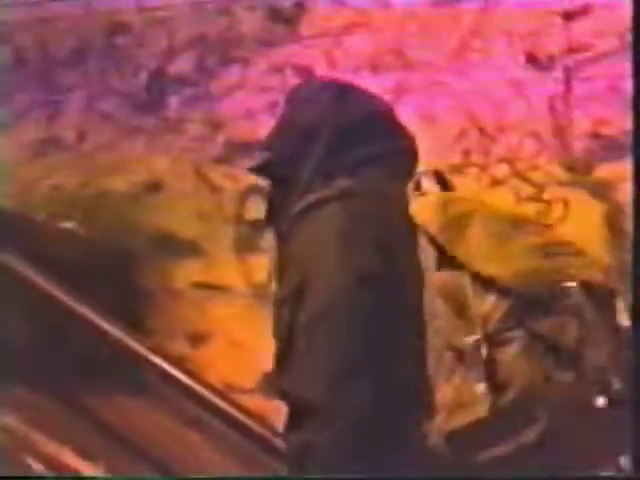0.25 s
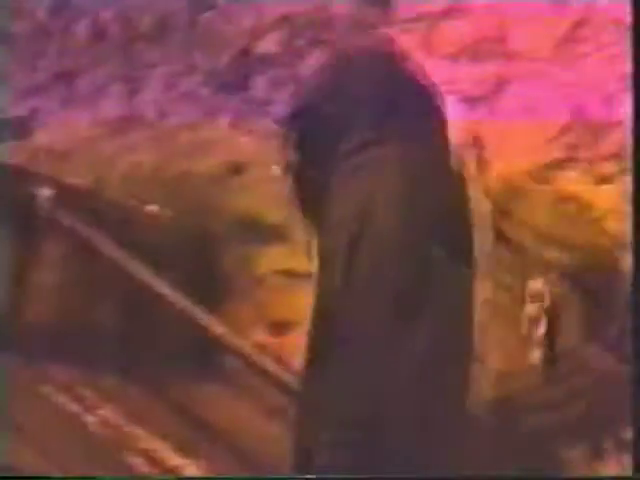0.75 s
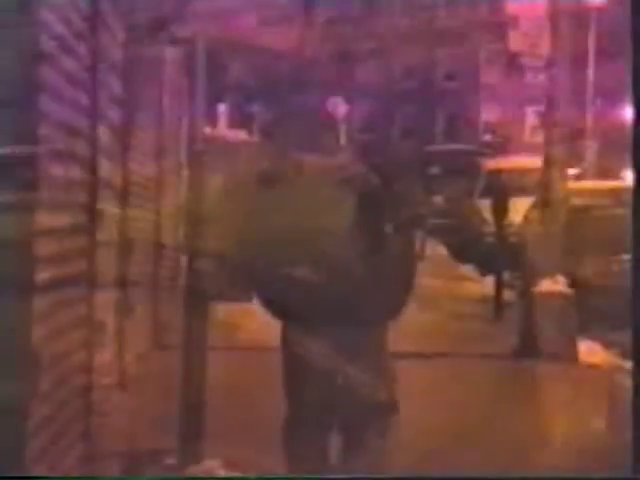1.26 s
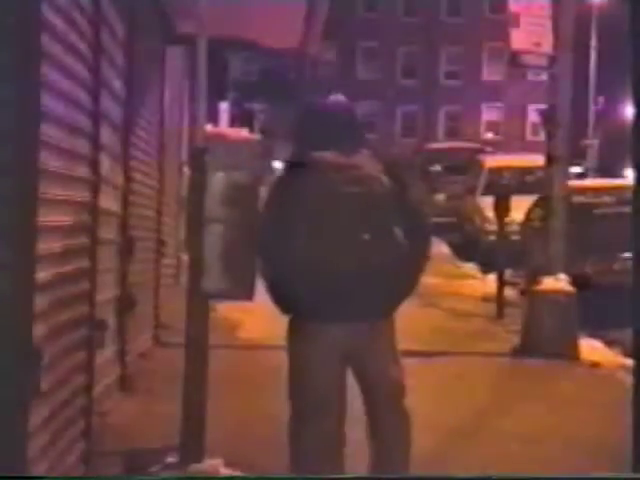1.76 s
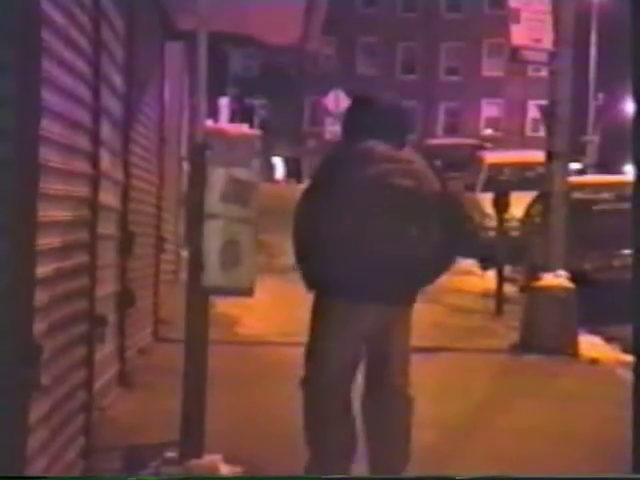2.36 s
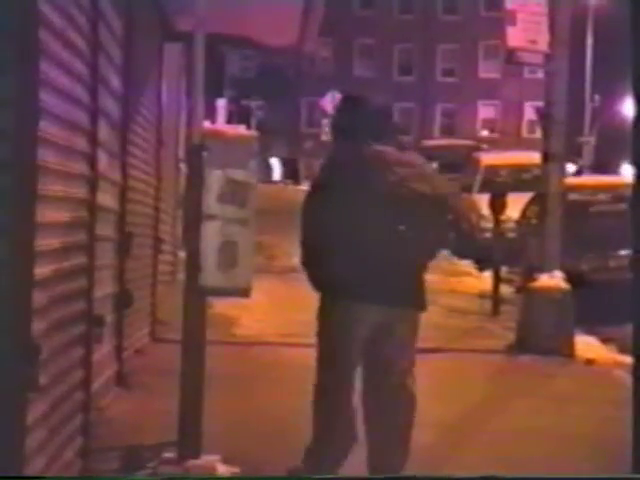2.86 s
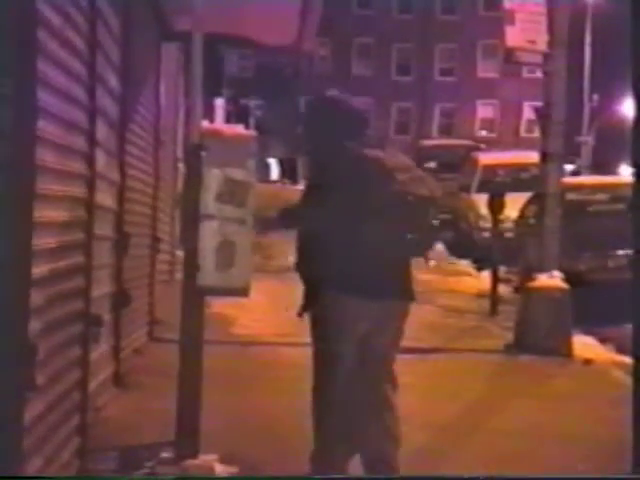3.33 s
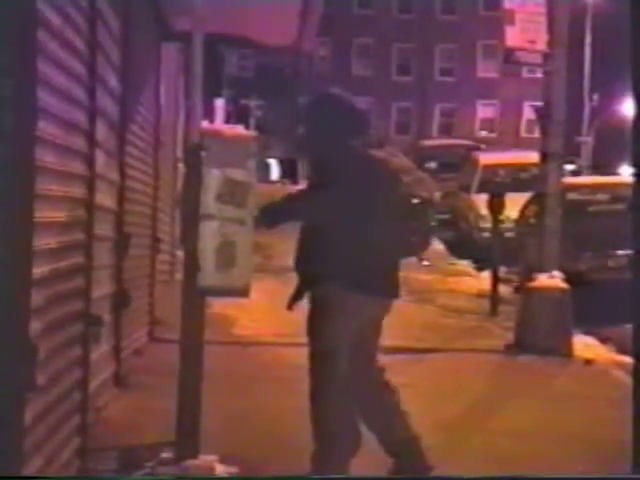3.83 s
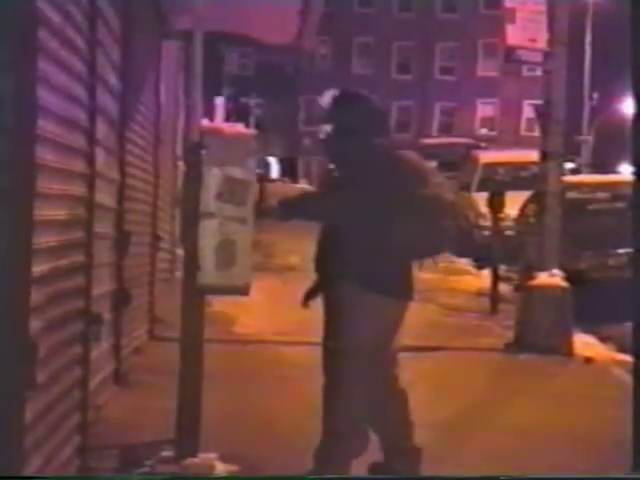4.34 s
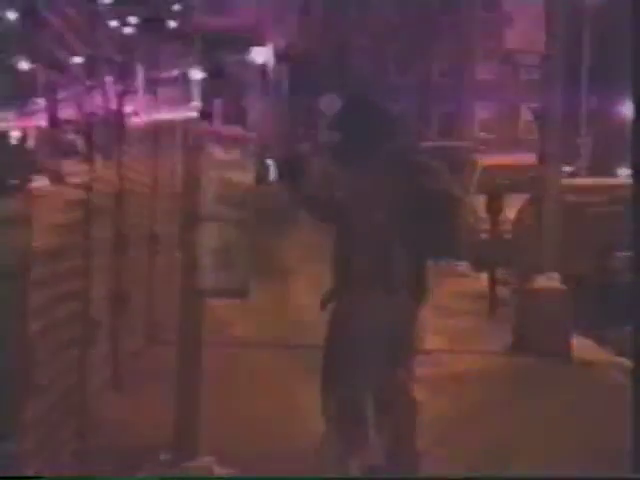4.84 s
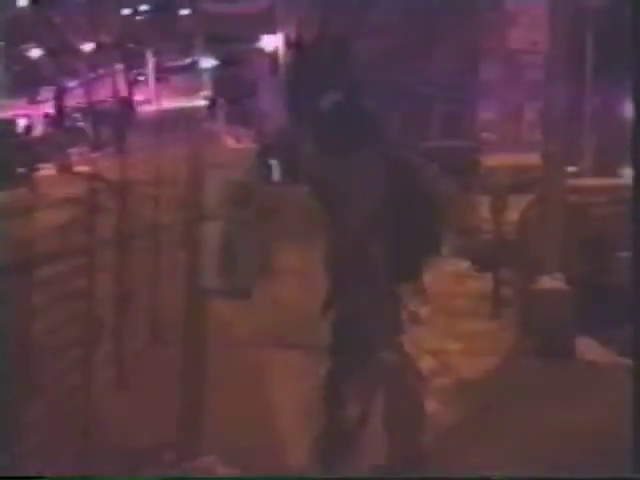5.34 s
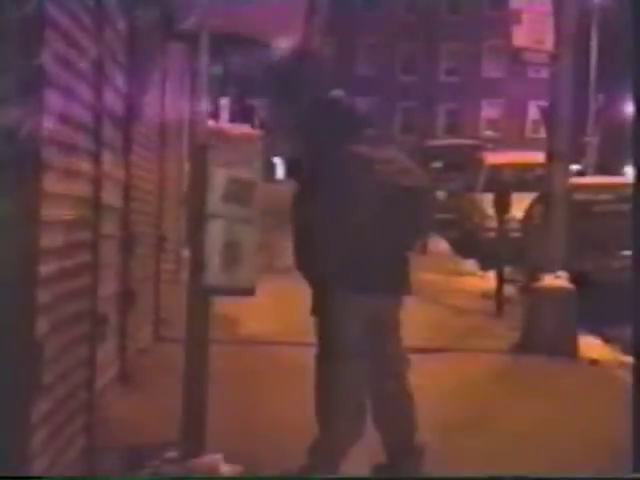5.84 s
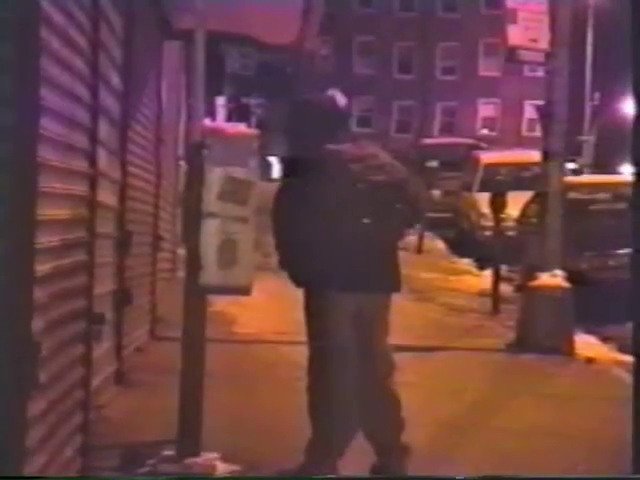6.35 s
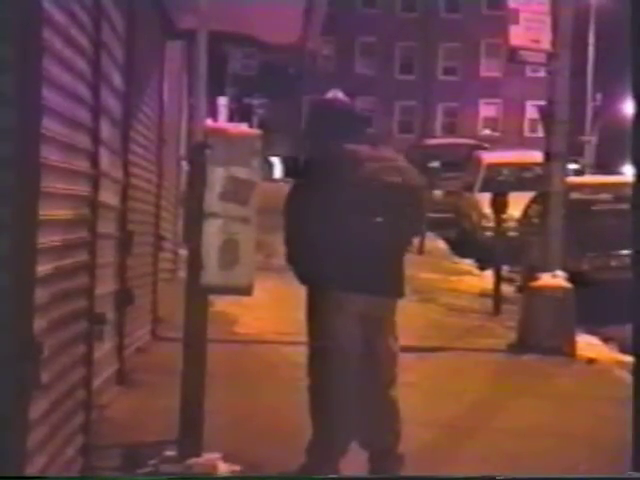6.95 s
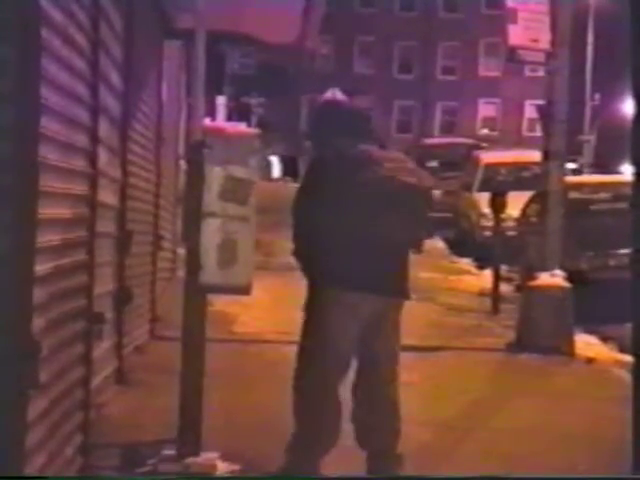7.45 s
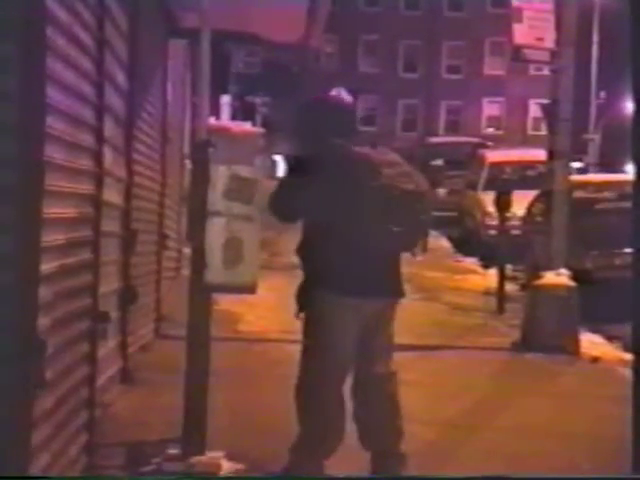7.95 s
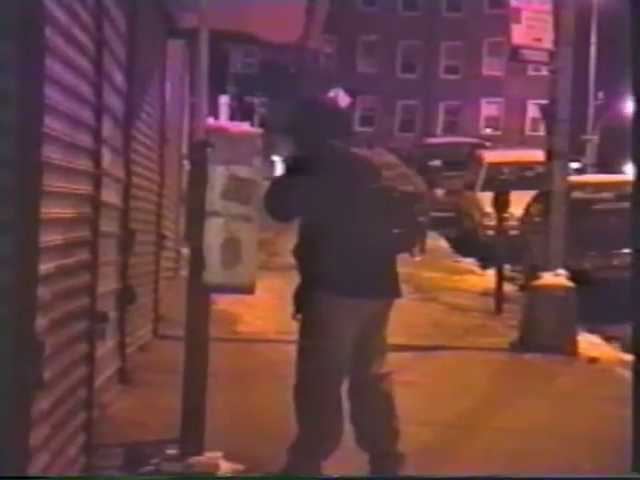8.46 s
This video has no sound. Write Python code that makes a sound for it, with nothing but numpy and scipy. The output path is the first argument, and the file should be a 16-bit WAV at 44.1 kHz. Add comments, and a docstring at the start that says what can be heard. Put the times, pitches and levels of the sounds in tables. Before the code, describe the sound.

Blank soundtrack noise, taken directly from the tape head without any microphone, place or distance. Airy, treble-heavy hiss dominates from start to end, roughened by a rapid flutter. A low mains hum, strongest around 180 hertz, wavers minutely under it, joined by faint field buzz, motor tones, a very high whistle and a soft low murmur. Tiny dips in the hiss occur early and again late; no footsteps, traffic or city sounds.

```python
"""Bright tape hiss comes first: it flutters, drifts and drops out briefly, heard straight off the head of a
worn video tape with a blank sound track, so there is no room, no distance and no microphone.
Under this shaped noise lie sums of sines: the odd overtones of mains hum printed on the tape, a buzz at the
picture's field rate, a few faint motor tones and the whistle of the line scan. Noise also makes a low murmur.
The converter sits on a constant offset."""
import sys
import numpy as np
from scipy.fft import rfft, irfft, next_fast_len
from scipy.io import wavfile
from scipy.ndimage import map_coordinates

SR = 44100
rng = np.random.default_rng(int(sys.argv[2]) if len(sys.argv) > 2 else 0)


def unload_audio(sound):
    """Save the sound as a 16-bit wav file, at the path given as the first command line argument."""
    columns = np.transpose(np.atleast_2d(sound))
    # keep every value between -1 and 1, then stretch to whole-number steps
    steps = np.round(np.clip(columns, -1, 1) * 32767)
    wavfile.write(sys.argv[1], SR, steps.astype(np.int16))


N = 383229
T = np.arange(N) / SR
SLOW = np.arange(0, N / SR, .002)  # s, coarse time grid for slow curves

MAINS_HZ, FIELD_HZ = 59.996, 59.94
IN_STEP_S = -1.5  # s, moment when the two slowly beating fundamentals agree


def amp(db):
    """Gain of a level in dB."""
    return 10 ** (np.asarray(db) / 20)


def unit(x):
    """x scaled to rms 1."""
    return x / np.sqrt(np.mean(x ** 2))


def wobble(rate):
    """A smooth random curve through normally distributed knots, rate knots a second."""
    knots = rng.standard_normal(int(N * rate / SR) + 4)
    curve = map_coordinates(knots, [SLOW * rate])  # cubic spline
    return np.interp(T, SLOW, curve)


def filtered(x, response):
    """x with its spectrum multiplied by a response, a function of frequency in Hz."""
    m = next_fast_len(N + 8192)
    gain = response(np.fft.rfftfreq(m, 1 / SR))
    return irfft(rfft(x, m) * gain, m)[..., :N]


def noise(points):
    """Noise of rms 1 coloured by (Hz, dB) points on a log frequency axis, all but silent outside them."""
    f, db = np.transpose(points)

    def colour(hz):
        return amp(np.interp(np.log(hz + 1), np.log(f), db, -120, -120))

    return unit(filtered(rng.standard_normal(N), colour))


def overtones(table, turns):
    """Sines on whole multiples of a phase in turns, read from one drawn cycle."""
    start = rng.random(len(table))  # turns
    start[0] = 0  # only the first has a known start
    cycle = np.linspace(0, 1, num=4097)
    shape = 0
    for (multiple, db), p in zip(table, start):
        sine = np.sin(2 * np.pi * (round(multiple) * cycle + p))
        shape = shape + np.sqrt(2) * amp(db) * sine  # sqrt(2) turns rms into peak
    return np.interp(turns % 1, cycle, shape)


def hiss():
    """Tape hiss; any gap between tape and head costs short wavelengths, the treble, most."""
    # colour of the hiss: f/Hz, relative level/dB per Hz
    hiss_colour = [(8, -9), (70, -7), (125, -10), (270, -11), (800, -12.5), (1600, -9.5), (4700, -4.7),
                   (8500, -1.4), (10600, 0), (12000, -1.5), (12700, -4.3), (13300, -9.7), (14300, -21),
                   (14800, -22.7), (15800, -23)]
    # slow drift of the treble hiss: t/s, level/dB at 10 kHz
    contact = [(0, 1), (.7, 1), (1.5, -0.5), (2.6, 0.26), (4.2, 0.55), (4.9, 1), (5.9, -0.5), (7.2, 0),
               (8.69, 0.9)]
    # centres of the overlapping bands: f/Hz
    bands_hz = [0, 4000, 8000, 12000, 16000]
    flutter_hz = 82.025

    drift_db = np.interp(T, *np.transpose(contact))
    drift_db = drift_db + 0.26 * wobble(12) + 0.24 * wobble(45) - dropouts()
    # the tape itself vibrates past the head
    phase = 2 * np.pi * flutter_hz * (T - .001)
    flutter_db = 0.9 * np.cos(phase) + .22 * np.cos(2 * phase)  # dB at 10 kHz

    grain, out = noise(hiss_colour), 0
    for hz, pick in zip(bands_hz, np.eye(len(bands_hz))):
        # triangular bands that sum to one
        band = filtered(grain, lambda f: np.interp(f, bands_hz, pick))
        # both movements grow with frequency, the flutter more steeply
        level_db = drift_db * (hz / 1e4) ** .7 + flutter_db * (hz / 1e4) ** 1.6
        out = out + band * amp(level_db)
    return amp(-52) * out


def dropouts():
    """Loss in dB at 10 kHz as the tape lifts off the head: clear drop-outs and faint random ones, equally short."""
    # clear drop-outs: t/s, depth/dB at 10 kHz
    clear_drops = [(1.459, 4), (1.856, 3.1), (5.532, 1), (6.95, 6), (7.108, 2.1), (7.162, 2.5), (7.601, 3)]
    drop_s = 0.024  # s, length of a drop-out
    faint_per_s, faint_db = 1.2, 1.2  # faint drop-outs a second; their mean depth in dB

    faint = rng.random((round(faint_per_s * N / SR), 2))
    faint_drops = [(at * N / SR, faint_db * (.5 + size)) for at, size in faint]
    loss_db = 0
    for at, db in [*clear_drops, *faint_drops]:
        loss_db = loss_db + abs(db) * np.exp(-(2 * (SLOW - at) / drop_s) ** 4)  # flat-topped dip
    return np.interp(T, SLOW, loss_db)


def hum():
    """Mains hum printed on the tape, so uneven tape speed shakes its timing."""
    # mains overtones: multiple of the mains frequency, mean level/dB rms
    mains_overtones = [(1, -80), (3, -62.5), (5, -67), (7, -74), (9, -74), (11, -79.5), (13, -85),
                       (15, -74), (17, -91), (19, -91), (21, -79), (23, -89), (25, -87), (27, -91),
                       (31, -86.5), (33, -88), (39, -85), (43, -87.5), (45, -87.5)]
    wow_hz = 2.66
    slip_s = 6e-5 * np.sin(2 * np.pi * wow_hz * T) + 4e-5 * wobble(4) + 3e-5 * wobble(14)
    turns = MAINS_HZ * (T - IN_STEP_S + slip_s)
    return amp(0.34 * wobble(3.02)) * overtones(mains_overtones, turns)


def buzz():
    """The picture signal leaks in once a field, locked to a crystal, so its pitch is steady."""
    # field overtones: multiple of the field rate, level/dB rms
    field_overtones = [(1, -79), (2, -94), (4, -86), (6, -88.5), (8, -93), (10, -85), (12, -88), (14, -89),
                       (16, -93), (17, -90), (18, -85), (22, -91), (24, -90), (26, -91), (28, -89),
                       (29, -90), (30, -91), (32, -91), (36, -90)]
    return overtones(field_overtones, FIELD_HZ * (T - IN_STEP_S))


def tones():
    """Thin tones of steady pitch, perhaps of the transport motors and the line scan, each wavering in level."""
    # thin tones: f/Hz, middle level/dB rms
    thin_tones = [(75, -87), (86.13, -78), (149.08, -78), (152.39, -78), (164.55, -81.5), (167.85, -85),
                  (329.8, -91), (344.9, -90), (389.8, -90), (737.7, -91), (1049.1, -89), (8000.09, -80),
                  (14034, -97), (14754, -98), (15474, -100), (15652.4, -94), (15674.5, -95),
                  (15734.38, -84), (15747.15, -89)]
    out = 0
    for hz, db in thin_tones:
        gain = np.sqrt(2) * amp(db + 0.98 * wobble(1.7))
        out = out + gain * np.sin(2 * np.pi * (hz * T + rng.random()))
    return out


def rumble():
    """A low murmur of band-shaped noise around the strongest hum tone, swelling slowly."""
    # colour of the murmur: f/Hz, relative level/dB per Hz
    murmur_colour = [(92, -16), (105, -5), (135, -8), (160, -1), (180, -2), (210, -6), (232, -16)]
    return amp(-77.5 + 2.1 * wobble(1.23)) * noise(murmur_colour)


def scene():
    """All layers add up on the one track."""
    return (hiss() + hum() + buzz() + tones() + rumble())[None]


def record(dry):
    """Nothing passes above the band limit; the converter adds its constant offset."""
    top_hz, offset = 15765, .047  # Hz; fraction of full scale
    return filtered(dry, lambda hz: hz < top_hz) + offset


dry = scene()
out = record(dry)
unload_audio(out)
```